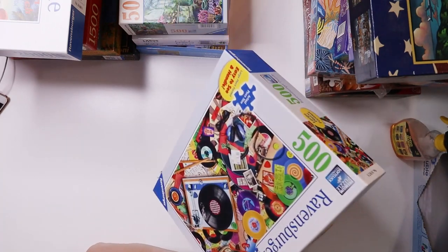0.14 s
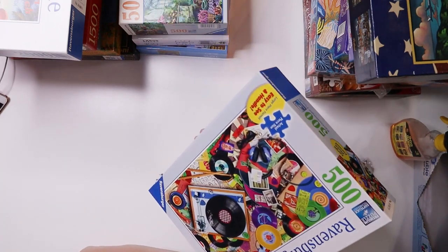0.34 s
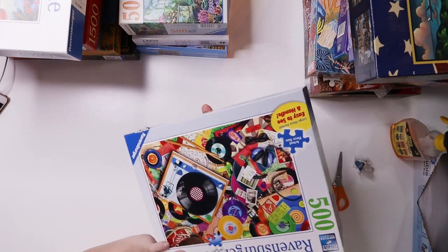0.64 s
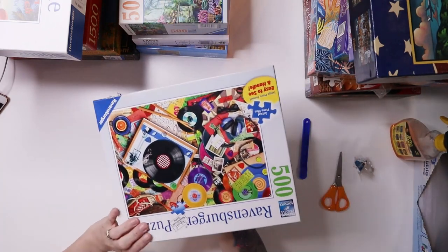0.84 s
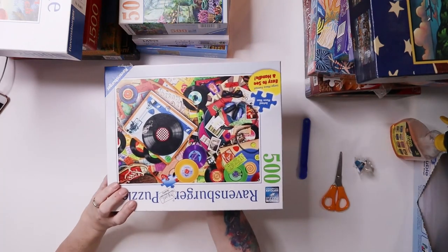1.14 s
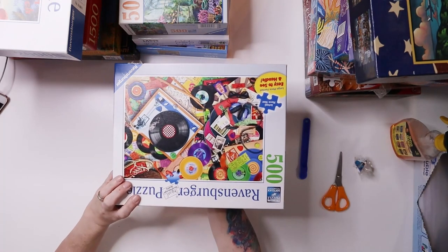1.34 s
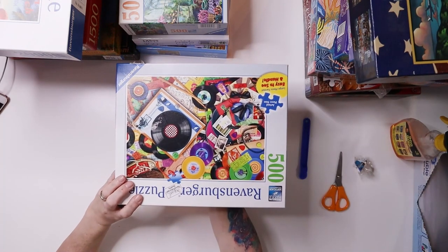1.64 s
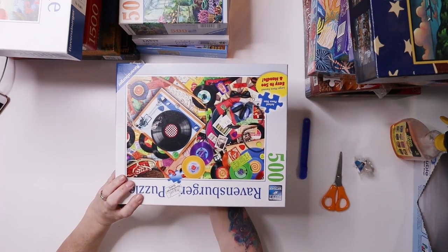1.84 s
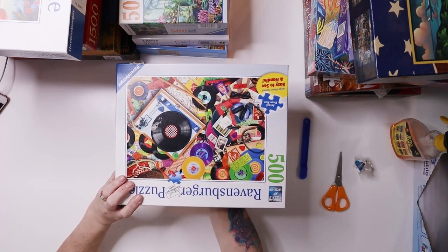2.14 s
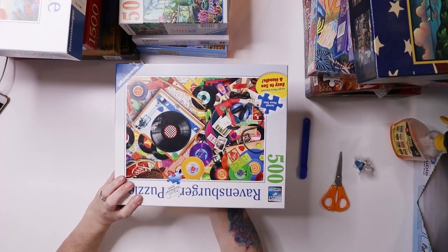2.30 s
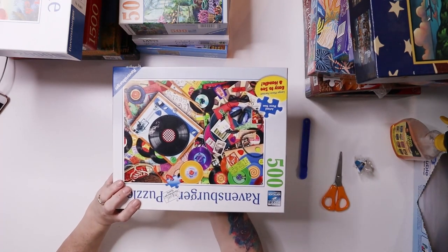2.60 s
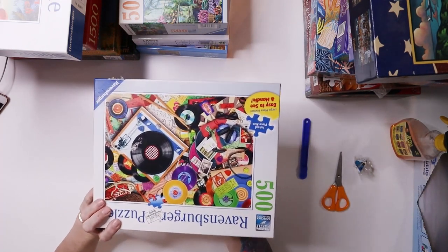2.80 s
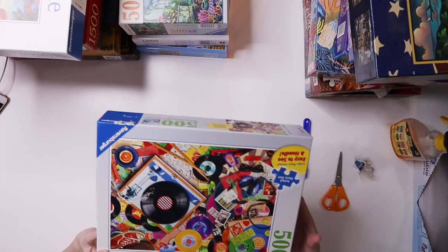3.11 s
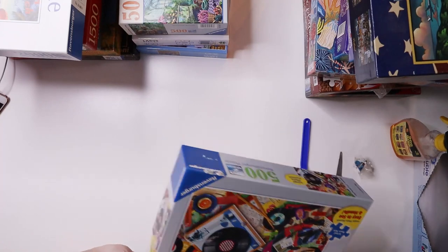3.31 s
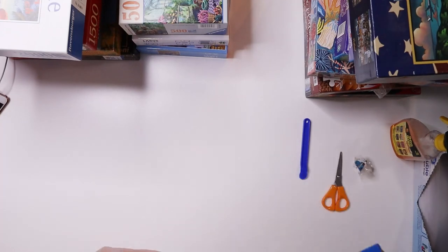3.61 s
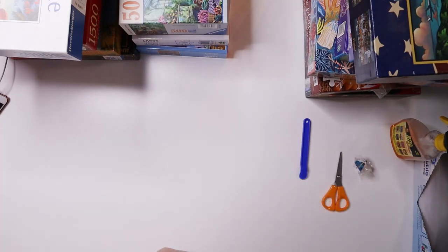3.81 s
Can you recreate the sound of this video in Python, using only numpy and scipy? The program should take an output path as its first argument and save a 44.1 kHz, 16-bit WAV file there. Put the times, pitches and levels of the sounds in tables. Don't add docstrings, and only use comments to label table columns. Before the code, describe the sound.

A full cardboard puzzle box is turned in the hands, loose pieces rattling and pouring inside

```python
import sys
import numpy as np
from scipy import signal
from scipy.fft import rfft, irfft
from scipy.io import wavfile
from scipy.ndimage import uniform_filter1d, map_coordinates

SR = 44100
rng = np.random.default_rng(int(sys.argv[2]) if len(sys.argv) > 2 else 0)


def store_pcm(level_fs):
    pcm = np.round(np.clip(level_fs, -1, 1) * 32767).astype(np.int16)
    wavfile.write(sys.argv[1], SR, np.atleast_2d(pcm).T)


def ratio_of_db(decibels):
    return 10 ** (np.asarray(decibels, float) / 20)


N = 174195


def evened(x):
    return x / np.sqrt(np.mean(x ** 2) + 1e-20)


def read(points, hz):
    f, value = np.transpose(points)
    return np.interp(np.log(hz + 1), np.log(f + 1), value)


def follow(curve):
    s, db = np.transpose(curve)
    return ratio_of_db(np.interp(np.arange(N) / SR, s, db))


def add(mix, s, sound):
    part = mix[round(s * SR):][:len(sound)]
    part += sound[:len(part)]


def ring(hz, db, t60, count=3000):
    t = np.arange(count)[:, None] / SR
    return (ratio_of_db(db - 60 * t / t60) * np.sin(2 * np.pi * hz * t)).sum(axis=1)


def pair(a, b):
    # frequency in Hz, likeness of the two ports from -1 to 1.
    likeness = [(80, .93), (300, .95), (600, .8), (1200, .45), (2500, .0), (6000, -.3), (12000, -.65)]
    hz = np.fft.rfftfreq(len(a), 1 / SR)
    same = np.clip(read(likeness, hz), -1, 1)
    mid = np.sqrt((1 + same) / 2) * rfft(a)
    side = np.sqrt((1 - same) / 2) * rfft(b)
    return irfft(np.array([mid + side, mid - side]), len(a))


def hiss(spectrum, patchy_db):
    frames = N // 128 + 5
    a, b, patches = rng.standard_normal((frames, 257, 3)).T
    patches = uniform_filter1d(patches, size=6, axis=0)
    patches = evened(uniform_filter1d(patches, size=20, axis=1))
    white = signal.istft((a + 1j * b) * ratio_of_db(patchy_db * patches), nperseg=512, noverlap=384)[1][:N]
    colour = ratio_of_db(read(spectrum, np.fft.rfftfreq(N, 1 / SR)))
    return evened(irfft(rfft(white) * colour, N))


def fan():
    # frequency in Hz, width of the wavering in Hz, level in dB.
    fan_tones = [
        (90.1, 7.7, -51),
        (244.3, 5.1, -55),
        (328.5, 3.7, -62),
    ]
    # frequency in Hz, air spectrum in dB per Hz.
    air_colour = [(12, -47), (24, -15.5), (191, -4), (245, -5), (289, -12.5), (581, -12), (631, -14.5),
                  (13100, -41), (15500, -73)]
    t = np.arange(N) / SR
    tones = 0
    for hz, width_hz, db in fan_tones:
        r = np.exp(-np.pi * width_hz / SR)
        slow = signal.lfilter([1 - r], [1, -r], rng.standard_normal(N) + 1j * rng.standard_normal(N))
        wavering = (slow / np.std(slow) + 1) * np.exp(2j * np.pi * hz * t)
        tones = tones + ratio_of_db(db) * evened(wavering.real)
    return tones + ratio_of_db(-45.5) * pair(hiss(air_colour, patchy_db=1), hiss(air_colour, patchy_db=1))


def tail():
    # frequency in Hz, room decay t60 in seconds.
    room_decay = [(150, 0.51), (500, 0.53), (1500, 0.35), (4000, 0.69), (10000, 0.08)]
    late_db, early_db, early_t60 = -3, -3, 0.035
    half = SR // 2
    taps = np.zeros((4, half))
    at = np.arange(60, half - 20, 20) + rng.integers(0, 20, (4, (half - 61) // 20))
    np.put_along_axis(taps, at, rng.choice([-1., 1.], at.shape), 1)
    early = taps[2:] * ratio_of_db(-60 * np.arange(half) / SR / early_t60)
    hz, t, z = signal.stft(taps[:2], SR, nperseg=256)
    fading = ratio_of_db(-60 * t / read(room_decay, hz)[:, None])
    late = signal.istft(z * fading, SR, nperseg=256)[1][:, :half]
    return ratio_of_db(late_db) * late / np.linalg.norm(late[0]) + ratio_of_db(early_db) * early / np.linalg.norm(early[0])


def room(x):
    turn = 2 * np.pi * np.cumsum(12 * np.ones(N)) / SR
    share = [np.sqrt(2 / 3) * np.cos(turn + k * np.pi / 3) for k in range(3)]
    return pair(*sum(signal.fftconvolve((x * w)[None], tail(), axes=1)[:, :N] for w in share))


def fingers():
    # time in seconds, finger pressure in dB.
    pressure = [(0, -52.5), (.3, -60.5), (.4, -59.5), (.55, -49), (.93, -50.5), (1.03, -56.5), (1.3, -70),
                (2.62, -76), (2.74, -55.5), (2.93, -52.5), (3.0, -43), (3.18, -46), (3.26, -60.5),
                (3.5, -48.5), (3.95, -48.5)]
    # frequency in Hz, skin spectrum in dB per Hz.
    skin_colour = [(880, -61), (1500, -4.5), (1970, -11.5), (2890, -7.5), (4890, -12), (11300, -9),
                   (15500, -22.5)]
    return 2 * follow(pressure) * pair(hiss(skin_colour, patchy_db=1), hiss(skin_colour, patchy_db=1))


def tick(s, db, hz):
    own_share, edge, decay_s, level_db = 1.33, 4.9, 0.0018, 2
    noise = rng.standard_normal((500, 3))
    noise = noise[:, :1] + own_share * noise[:, 1:]
    noise = noise * np.exp(-np.arange(500)[:, None] / SR / decay_s)
    noise[0] = edge
    band = signal.butter(2, [hz * 0.37, min(hz * 1.26, 14000)], "band", fs=SR, output="sos")
    snap = signal.sosfilt(band, noise, axis=0)
    return s, ratio_of_db(db + level_db) * snap / abs(snap).max()


def panels(tilt_db=0):
    # frequency in Hz, voice of the panels in dB per Hz.
    panel_voice = [(76, -43), (130, -6.5), (419, -5.5), (500, -9), (641, -2.5), (701, -5.5), (1610, -10.5),
                   (9000, -40), (11700, -71), (19800, -120)]
    t60_at_500_hz, t60_slope, spread_db = 0.066, -0.21, 1
    place, weight, sign = rng.random((3, 80))
    hz = 130 * 70 ** ((np.arange(80) + place) / 80)
    t60 = t60_at_500_hz * (hz / 500) ** t60_slope
    db = read(panel_voice, hz) + 10 * np.log10(hz / t60) + spread_db * weight
    db = db + tilt_db * np.log2(np.maximum(hz / 700, 1))
    t = np.arange(3000)[:, None] / SR
    body = (ratio_of_db(db - 60 * t / t60) * np.sin(2 * np.pi * hz * t) * np.sign(sign - .5)).sum(axis=1)
    return body / np.linalg.norm(body)


def pieces():
    # time in seconds, stir of the load in dB.
    stir = [(0, -32), (.17, -41.5), (.45, -42), (.62, -34), (.96, -34), (1.08, -39), (1.6, -57),
            (1.9, -61.5), (2.65, -53), (2.8, -43), (2.95, -46), (3.3, -37.5), (3.46, -24.5), (3.55, -21),
            (3.7, -20), (3.85, -23.5), (3.95, -38)]
    hits_per_s, size_db, level_db = 2500, 2, -4.5
    size = ratio_of_db(size_db * np.minimum(rng.exponential(1, N), 4)) * (rng.random(N) < hits_per_s / SR)
    hits = evened(size * rng.choice([-1., 1.], N)) * follow(stir)
    spot = rng.integers(0, 16, N)
    return ratio_of_db(level_db) * sum(signal.oaconvolve(hits * (spot == k), panels())[:N] for k in range(16))


def blow(s, db, low_hz, high_hz, high_db):
    contact_s, softness, level_db = .0008, 0.13, -4.5
    push = rng.standard_normal(600) ** 3 * np.exp(-np.arange(600) / SR / contact_s)
    push[0] = 16
    body = panels(softness * (high_db + 3.0))
    body = body / abs(body).max() + ring(low_hz, db=-1.5, t60=0.042)
    bright = ring(high_hz * np.array([1, 1.07, .92]), np.array([0, -4, -4]), t60=0.028)
    low = signal.fftconvolve(push, body)
    high = signal.fftconvolve(push, bright)
    both = low / abs(low).max() + ratio_of_db(high_db + 2) * high / abs(high).max()
    return s, ratio_of_db(db + level_db) * both


def ports(x, share):
    # time in seconds, delay of the left port in seconds, left excess in dB.
    path = [
        (0, -.00009, 1),
        (.98, -.00009, 0),
        (1.1, .00009, -1),
        (3.3, .00009, -2),
        (3.44, -.00007, -2),
        (3.95, -.00007, 0),
    ]
    at = np.arange(N)
    s, delay_s, left_db = np.transpose(path)
    lag = share * np.interp(at / SR, s, delay_s) * SR / 2
    lean = ratio_of_db(np.interp(at / SR, s, left_db) / 2)
    return np.array([map_coordinates(x[0], [at - lag]) * lean, map_coordinates(x[-1], [at + lag]) / lean])


def scene():
    # start in seconds, peak in dB, panel note in Hz, bright note in Hz, bright share in dB.
    blows = [(0.005, -14.5, 1010, 1270, 0), (0.048, -14, 587, 1180, -5), (0.124, -18.5, 641, 1110, -4.5),
             (0.292, -22.5, 636, 2660, -6), (0.489, -23, 630, 1650, -20), (0.557, -18.5, 804, 1920, -9.5),
             (0.648, -10.5, 654, 1430, -21), (0.666, -9, 221, 1180, -6.5), (0.691, -15, 733, 1270, -12),
             (0.742, -12.5, 850, 1080, -26), (0.765, -11.5, 637, 1040, -10), (0.802, -12, 428, 1080, -3),
             (0.814, -11, 214, 2140, -11), (0.88, -13.5, 828, 1410, -13), (0.916, -15.5, 664, 2230, -4.5),
             (0.92, -10, 218, 1120, -5.5), (0.949, -23, 207, 1330, -25),
             (1.167, -15, 663, 2400, -7), (1.242, -16.5, 380, 1530, -33), (1.286, -42, 218, 1370, 5),
               (1.412, -23.5, 596, 1670, -44), (1.428, -9.5, 676, 1160, -13), (1.455, -15, 435, 1600, -30),
               (1.492, -12, 660, 1206, -46), (1.501, -23, 444, 1460, -40), (1.523, -17.5, 450, 1480, -35),
               (1.572, -23, 425, 1640, -45), (1.665, -13.5, 425, 1597, 0.5), (1.678, -11.5, 420, 1460, -39),
               (1.696, -16.5, 412, 1550, -17), (1.749, -11, 600, 1610, -10), (1.985, -37, 496, 1994, 5),
             (2.759, -22.5, 302, 1530, -37), (2.83, -26.5, 397, 1350, -66),
               (3.209, -19.5, 797, 1580, -14), (3.316, -19.5, 490, 1700, -18),
               (3.444, -14.5, 614, 1540, -8), (3.484, -9, 402, 3130, -22), (3.5, -15, 940, 1760, -2),
               (3.503, -0.5, 418, 1640, -12), (3.529, -7.5, 350, 1535, 0.5), (3.555, -5.5, 464, 2310, -2.5),
               (3.606, -12.5, 630, 1550, 0.5), (3.634, -7.5, 826, 1670, 2.5), (3.67, -9, 300, 2300, -4),
               (3.699, -7.5, 720, 1360, -10), (3.72, -22, 657, 1480, -18), (3.768, -7, 425, 1310, -16),
               (3.835, -5, 846, 1400, -3.5),
             (1.176, -20, 920, 2530, -13), (1.25, -18.5, 392, 1410, -46), (1.288, -30.5, 490, 1510, 6.5),
               (3.06, -28.5, 189, 1500, -27), (3.118, -22, 240, 1500, -27), (3.16, -31, 192, 1500, -25),
               (3.24, -27, 497, 1500, -42), (3.465, -18, 500, 1500, -9), (3.567, -23, 424, 2120, 3),
               (3.586, -16, 507, 1400, -31), (3.618, -13, 580, 3000, -3.5), (3.647, -8, 710, 1630, -8),
               (3.661, -12.5, 650, 2260, -8), (3.684, -8.5, 440, 1980, -20), (3.714, -3.5, 728, 1360, -7.5),
               (3.733, -8, 640, 1310, -27), (3.75, -11, 640, 1290, -20), (3.781, -15.5, 725, 1290, -22),
               (3.8, -10, 641, 1380, -12), (3.812, -10.5, 614, 1300, -15), (3.828, -9.5, 874, 1470, -9),
               (3.843, -9.5, 820, 1520, -13), (3.852, -13, 730, 1860, 2), (3.877, -16, 800, 1390, -2),
               (3.27, -25, 170, 1400, -40), (3.36, -16, 190, 1400, -42), (3.41, -17, 208, 1400, -37)]
    # start in seconds, peak in dB, centre in Hz.
    dry_ticks = [(.006, -22.5, 4430), (.046, -14.5, 8340), (.05, -19, 5350), (0.293, -23, 4300),
                 (0.561, -23, 3600), (.664, -19, 3900), (.743, -21, 1290), (.765, -20, 3770),
                 (.815, -27, 3400), (.882, -21, 3000), (0.913, -22, 4220), (1.167, -26.5, 3520),
                 (1.177, -22, 3560), (1.429, -17, 2700), (1.494, -27.5, 4900), (1.529, -36, 5000),
                 (1.667, -25, 1970), (1.743, -31, 5840), (1.75, -25, 4450), (1.985, -43, 2280),
                 (2.106, -36, 6500), (2.674, -40, 5500), (2.702, -33, 5900), (2.832, -30, 3320),
                 (3.21, -20, 3280), (3.31, -26.5, 8250), (3.317, -28.5, 4930), (3.447, -26, 3020),
                 (3.482, -16, 3100), (3.503, -8, 3800), (3.531, -3, 3340), (3.598, -18, 6100),
                 (3.607, -16, 4500), (3.647, -16, 4770), (3.671, -25, 4500), (3.714, -19, 4940),
                 (3.827, -16, 4870)]
    # partial in Hz, level in dB, decay t60 in seconds.
    chime = [
        (998, -27, 0.044),
        (2438, -33, 0.092),
        (2636, -33.5, 0.055),
        (4354, -33, 0.027),
        (5146, -50, .05),
    ]
    loose, box, snaps = pieces(), np.zeros(N), np.zeros((N, 2))
    for row in blows:
        add(box, *blow(*row))
    low_cut = signal.butter(4, 146, "high", fs=SR, output="sos")
    loose, box = signal.sosfilt(low_cut, [loose, box])
    add(box, .2925, ring(*np.transpose(chime), count=9000))
    for row in dry_ticks:
        add(snaps, *tick(*row))
    snaps = signal.sosfilt(signal.butter(2, 10800, fs=SR, output="sos"), snaps.T)
    wet = room(loose + box + ratio_of_db(-2.5) * snaps[0])
    near = ports([loose], share=1) + ports(box + snaps, share=.5)
    left_db = -0.32
    return (near + wet + fingers() + fan()) * ratio_of_db([[left_db], [-left_db]])


def low_pass(x):
    return signal.sosfilt(signal.butter(12, 15700, fs=SR, output="sos"), x)


def record(dry):
    edge = signal.firwin(511, 15550, window=("kaiser", 9), fs=SR)
    mix = signal.oaconvolve(dry, edge[None], "same")
    return low_pass(mix)


dry = scene()
out = record(dry)
store_pcm(out)
```